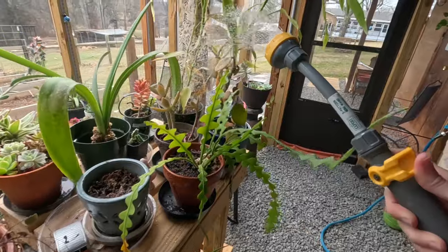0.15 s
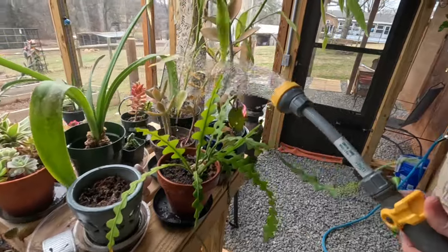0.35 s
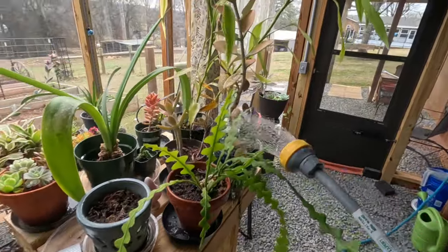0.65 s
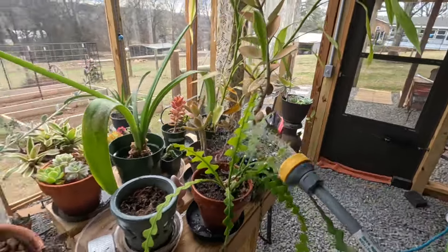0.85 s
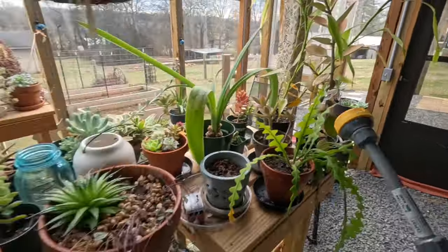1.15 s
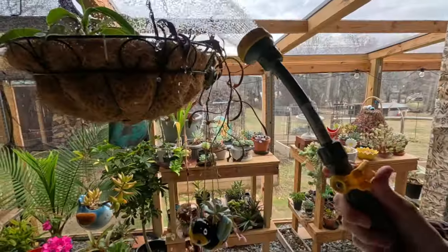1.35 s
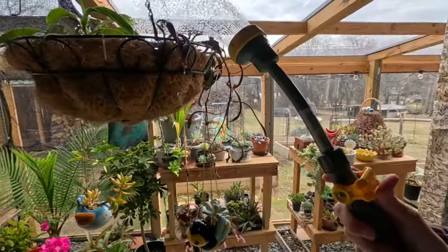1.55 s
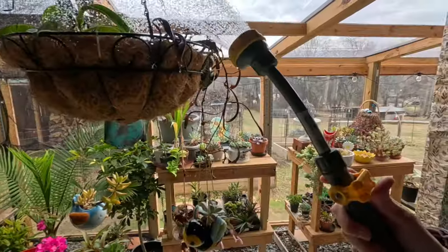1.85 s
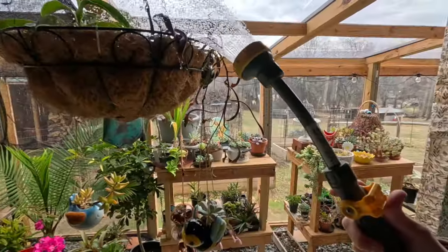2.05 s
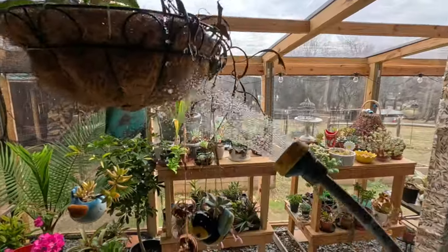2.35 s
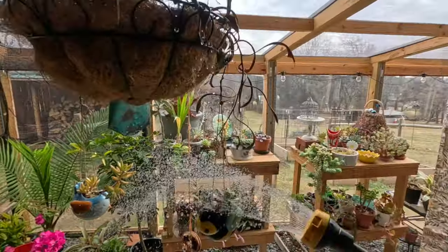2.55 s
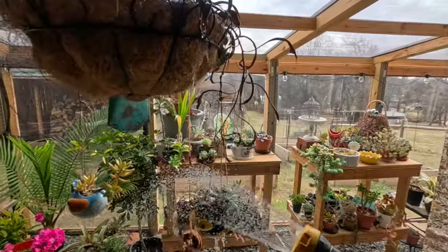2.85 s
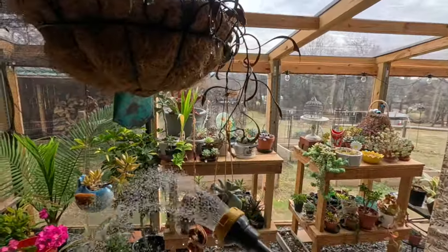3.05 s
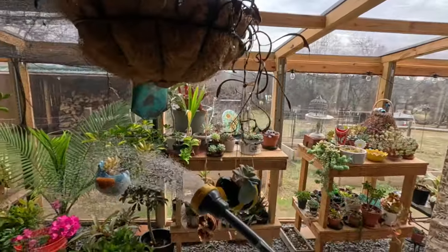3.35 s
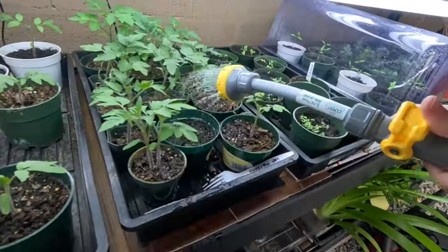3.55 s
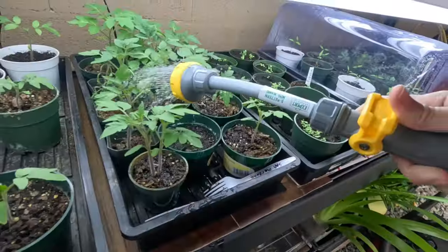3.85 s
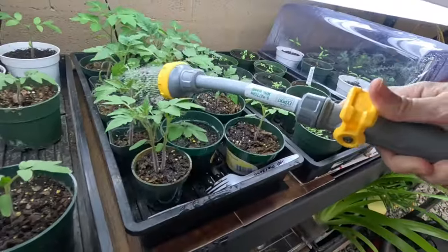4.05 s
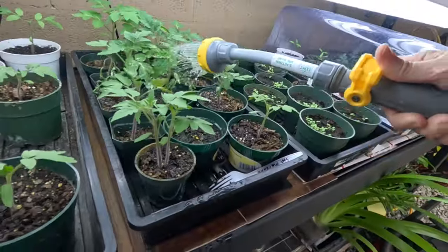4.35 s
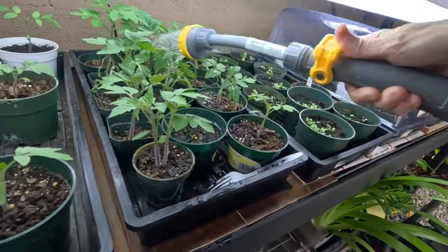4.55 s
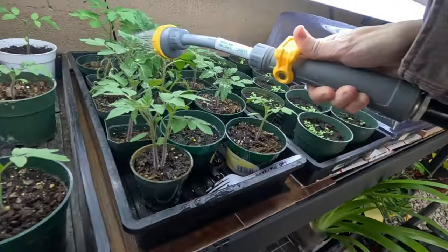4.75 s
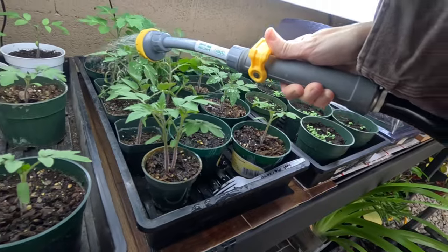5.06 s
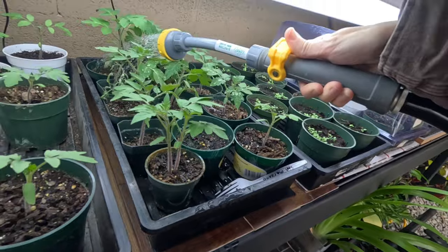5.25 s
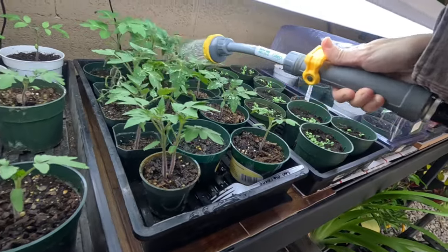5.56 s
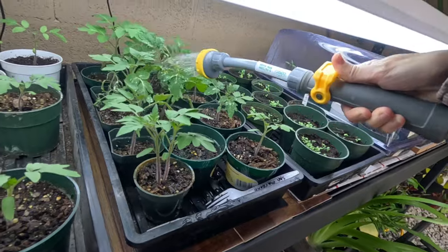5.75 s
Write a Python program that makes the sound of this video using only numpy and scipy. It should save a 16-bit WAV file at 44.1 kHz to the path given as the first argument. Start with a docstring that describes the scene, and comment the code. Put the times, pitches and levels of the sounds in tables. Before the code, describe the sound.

A short low thud opens, and water is already spraying from a hose wand close to the microphone, a dense hiss of droplets on potted plants in a greenhouse. At about 1 second the spray dies away, with a soft low thump and faint scuffs on gravel. It returns abruptly at 1.2 seconds, its tone shifting as it moves over a hanging basket, shrubs and pots. From about 1.4 seconds, run-off drips drum irregularly on hollow plastic a little to the left, growing busier after 2.3 seconds. At 3.5 seconds the drips stop and the hiss suddenly changes colour, continuing over trays of seedlings until the end, near 6 seconds. A few light knocks and splashes come between 3.6 and 5.3 seconds. A low rumble runs underneath throughout, and a soft hum comes and goes from about 2 seconds.

```python
"""A greenhouse, close to a hose wand, heard through a microphone with two ports. Droplets hiss on a bench, a
hanging basket, shrubs, pots, trays and seedlings, each with its own resonances. The spray dies away briefly,
with a scuff on gravel and a thump; then the hiss is back at full strength at once. Run-off drums on hollow
plastic a little to the left, until the hiss abruptly changes colour and the drips stop. A low thud opens; short
knocks and splashes come late. Under it all, a low rumble and at times a hum."""
import sys
import numpy as np
from scipy import signal
from scipy.fft import rfft, irfft
from scipy.io import wavfile
from scipy.ndimage import uniform_filter1d, map_coordinates

SR = 44100
rng = np.random.default_rng(int(sys.argv[2]) if len(sys.argv) > 2 else 0)


def dump(signal):
    """Clip the signal to [-1, 1] and save it as 16-bit WAV at the path in sys.argv[1]."""
    limited = np.clip(np.atleast_2d(signal).T, -1, 1)
    pcm = np.round(limited * 32767).astype(np.int16)
    wavfile.write(sys.argv[1], SR, pcm)


N = 259749
TIME = np.arange(N) / SR
SHUT_S, RETURN_S = .96, 1.2175  # the trigger is let go; the hiss is back at full strength at once
DRIPS_END_S = 3.47  # the drips stop as the hiss abruptly changes colour

# Where splash, patter, hiss and mist sound. Each row: lower edge in Hz, upper edge in Hz.
SPRAY_BANDS = [(1000, 2100), (2100, 4000), (4000, 8300), (8300, 13000)]
# Droplet impacts on any target. Each row: frequency in Hz, relative level in dB.
DROPLET_SPECTRUM = [(300, -25.5), (750, -29), (1100, -22.5), (1280, -12.5), (1480, -17.5), (1950, -19),
                    (2400, -6.5), (4000, -6), (6400, -4.5), (8400, -5), (11000, -4.5), (12400, -7),
                    (13300, -19.5), (14200, -14)]
# Resonances of each target under the spray. Each row: centre in Hz, half width in Hz, lift in dB.
BENCH_MODES = [(2840, 270, 5.5), (4910, 480, 11.5), (5730, 240, 6.5), (6970, 260, 5), (7800, 1100, 10)]
BASKET_MODES = [(630, 170, -7), (2810, 250, 4), (4020, 180, -1.5), (4920, 310, 15.5), (5820, 320, 8.5),
                (7060, 290, 11), (7830, 220, 9.5)]
SHRUB_MODES = [(2700, 240, 3.5), (4895, 180, 10.5), (5570, 390, 9), (7380, 530, 12.5), (8700, 690, 5.5),
               (10800, 300, -5)]
POT_MODES = [(3150, 280, 8.5), (4000, 300, 0), (4930, 330, 9), (5760, 190, 6), (7100, 160, 6.5),
             (8150, 490, 4), (10500, 800, -2.5)]
TRAY_MODES = [(2875, 210, 10), (3640, 170, -5.5), (4660, 400, 13.5), (5750, 280, 11.5), (6990, 410, 10.5),
              (7750, 180, 11.5), (11050, 350, 0.5)]
SEEDLING_MODES = [(2630, 800, 11.7), (3580, 120, 6.5), (4730, 320, 9), (5630, 330, 5.7), (7100, 600, 8.3)]
# The spray on bench back, bench front, basket, shrubs, pots, trays and seedlings. Each row: relative
# hiss level in dB, then splash, patter and mist in dB against the hiss, left minus right in dB.
TARGET_LEVELS = [(-22.5, -20, -5, -5.5, 1.5), (-22.5, -18.5, -5.5, -7, 2.1), (-21, -20.5, -8.5, -10, 0.6),
                 (-21, -21.5, -8, -8.5, 1.5), (-22.5, -18, -3, -9, 3), (-20, -23, -6, -9, 1.6),
                 (-23, -19, -7, -6.5, 3)]
# One target's sound gives way to the next. Each row: start and end in seconds; an earlier end is a jump.
TARGET_CHANGES = [(.5, 0.53), (1.1, 0.97), (2.12, 2.5), (2.96, 3.07), (3.465, 3.475), (4.27, 4.42)]
# Brief swells and dips of the hiss around one pitch.
# Each row: time and half length in seconds, pitch in Hz, lift in dB.
HISS_SWELLS = [(0.32, 0.28, 4800, 5.5), (1.05, 0.049, 4900, -10), (1.36, 0.11, 2850, 5),
               (1.69, 0.048, 5050, 5), (2.03, 0.065, 5400, 5.5), (1.857, 0.22, 10230, 6),
               (2.27, 0.075, 10000, 9), (2.262, 0.081, 3050, 3.5), (2.808, 0.092, 7340, 2),
               (3.187, 0.054, 4900, 6), (3.188, 0.035, 3000, -7), (3.21, 0.037, 8000, 6.5),
               (3.911, 0.084, 2830, 2), (4.06, 0.23, 5788, 2.5), (4.52, 0.089, 7550, 6.5),
               (4.572, 0.085, 7200, 0), (4.47, 0.05, 3250, 3), (4.91, 0.17, 5150, 6.5),
               (5.6, 0.12, 5640, 2.5), (5.25, 0.28, 6000, 7), (5.13, 0.17, 6852, -4),
               (5.72, 0.098, 4800, 4)]
# The microphone's two ports.
# Each row: frequency in Hz, coherence, phase in radians, left minus right in dB.
MIC_PORTS = [(200, 0.19, -0.35, -3.5), (1300, 0.92, -0.53, -2.1), (2900, 0.7, -0.59, -4.5),
             (5070, 0.99, -0.96, -4.5), (6480, 0.048, 1, -2), (6900, 0.36, 0.46, 2), (7980, 1, -0.045, 0),
             (11400, 1, 0.0, 0), (11800, 0.87, 0.05, 0)]
# The low rumble's spectrum. Each row: frequency in Hz, relative level in dB.
RUMBLE_SPECTRUM = [(8, -38), (16, 2), (40, -6), (54, 4.5), (70, -1), (125, -8.5), (170, -8.5), (320, -27.5),
                   (700, -58), (1500, -69)]
# The rumble's slow rise and fall. Each row: time in seconds, level in dB.
RUMBLE_LEVELS = [(0, -38), (1.2, -42), (2.0, -38), (2.8, -41.5), (3.6, -37), (4.6, -37.5), (5.2, -39.5),
                 (5.89, -37.5)]
# A low thud at the start, then short knocks and splashes.
# Each row: start in seconds, level in dB, pitch in Hz, decay in seconds, relative width of the ring.
KNOCKS = [(.003, -23.5, 223, 0.017, 0.11), (3.62, -40.5, 780, 0.015, 0.72), (3.756, -44.5, 580, 0.017, .15),
          (4.208, -45, 315, 0.12, 0.27), (4.257, -32.5, 575, 0.016, 0.17), (4.92, -40, 1060, 0.035, 0.17),
          (5.214, -41.5, 1050, 0.062, 0.18)]
# Feet scuff the gravel as the spray stops. Each row: start and end in seconds, level in dB.
SCUFF_SPELLS = [(.84, .94, -43.5), (1.085, 1.2, -40.5)]
# The gravel's spectrum. Each row: frequency in Hz, relative level in dB.
GRAVEL_SPECTRUM = [(120, 1), (280, -2.5), (700, -7), (2000, -9.5), (4000, -19.5), (13000, -36)]
# Small run-off drops. Each row: start and end in seconds, relative level in dB.
DRIBBLE_SPELLS = [(1.35, 1.92, -48.5), (2.26, 3.02, -47.5), (3.09, 3.3, -42.5), (3.33, 3.45, -36)]
# Big run-off drops. Each row: start in seconds, relative level in dB, relative slap strength in dB.
BIG_DRIPS = [(1.44, -18, -9), (1.461, -26, -7), (1.548, -20, -1.5), (1.61, -21, 3.5), (1.735, -26.5, 3),
             (1.846, -20.5, -8), (1.877, -21.5, -7), (2.26, -21, -12), (2.411, -29.5, -4),
             (2.507, -16.5, -8.5), (2.526, -25.5, -17), (2.683, -14, -15), (2.699, -22, -13),
             (2.767, -21.5, -10), (2.805, -22, 0), (2.861, -23, 4), (2.917, -13.5, -3.5),
             (2.952, -15.5, -11), (2.966, -16.5, -10.5), (3.176, -20.5, -1), (3.235, -26, 9),
             (3.409, -19.5, -1.5)]
# The hollow plastic they land on. Each row: pitch in Hz, relative level in dB, seconds to fall 60 dB.
TUB_MODES = [(264, 1.5, 0.14), (333.5, 0, 0.18), (393, -8, 0.14), (503, -12.5, 0.17), (576.6, -10, 0.13),
             (600, -16, 0.067), (800, -13, 0.02), (835, -10.5, 0.074), (902, -0.5, 0.053),
             (961, -10.5, 0.17), (1287, -7, 0.056), (1650, -6.5, 0.032)]
# The soft hum. Each row: start and end in seconds, level in dB, pitch in Hz.
HUM_SPELLS = [(1.905, 3.35, -48, 157.5), (3.462, 4.593, -40.5, 161.5), (4.35, 4.825, -42, 147.7),
              (4.896, 5.213, -49.5, 149.4), (5.14, 5.85, -44, 159.7)]


def amp(db):
    """Decibels to gain."""
    return 10 ** (np.asarray(db) / 20)


def unit_rms(x):
    """Scales to rms 1."""
    return x / np.sqrt(np.mean(x ** 2) + 1e-20)


def curve_at(points, hz):
    """Reads a curve on a log-frequency axis."""
    f, value = np.transpose(points)
    return np.interp(np.log(hz + 1), np.log(f + 1), value)


def add(mix, start_s, sound):
    """Mixes a sound in at a time."""
    part = mix[round(start_s * SR):][:len(sound)]
    part += sound[:len(part)]


def coloured(x, spectrum):
    """Filters a signal by a spectrum, at rms 1."""
    return unit_rms(irfft(rfft(x) * amp(curve_at(spectrum, np.fft.rfftfreq(N, 1 / SR))), N))


def wander(samples):
    """Slow random drift at rms 1, smoothed over so many samples."""
    return unit_rms(uniform_filter1d(uniform_filter1d(rng.standard_normal(N), samples), samples))


def spells(rows, attack_s, release_s):
    """Gain of a sound that comes in spells: each rises, holds and dies away."""
    return sum(amp(db) * np.clip((TIME - start) / attack_s, 0, 1)
               * np.exp(-np.maximum(TIME - end, 0) / release_s) for start, end, db in rows)


def impacts(per_s, spread_db):
    """Random clicks; a few stand out, or fall back if the spread is negative."""
    size = amp(spread_db * np.minimum(rng.exponential(1, N), 5)) * rng.choice([-1, 1], N)
    return unit_rms(size * (rng.random(N) < per_s / SR))


def bell(x, centre, half_width):
    """A Gaussian bump of height 1."""
    return np.exp(-.5 * ((x - centre) / half_width) ** 2)


def target_spectra(hz):
    """Droplets excite each target's resonances, in dB; both ends of the bench ring alike."""
    targets = BENCH_MODES, BENCH_MODES, BASKET_MODES, SHRUB_MODES, POT_MODES, TRAY_MODES, SEEDLING_MODES
    lifts_db = [sum(db * bell(hz, centre, width) for centre, width, db in modes) for modes in targets]
    return curve_at(DROPLET_SPECTRUM, hz) + np.array(lifts_db)


def in_turn(per_target, t):
    """Blends one row per target as each gives way to the next."""
    progress = [np.ones(len(t))] + [np.interp(t, change, [0, 1]) for change in TARGET_CHANGES]
    return np.diff(per_target, axis=0, prepend=0).T @ np.array(progress)


def unsteady_hand(colour_db, t, drift=0.0059):
    """The hand is never still: all resonances slide up and down a little together."""
    row, frame = np.indices(colour_db.shape)
    stretch = 1 + drift * np.interp(t, TIME, wander(SR // 8))
    return map_coordinates(colour_db, [row * stretch, frame], order=1, mode="nearest")


def near_echoes(hz, t, strength=.125, nearest_s=.002, farthest_s=.006, drift_s=.0004, dull_hz=9000):
    """Ten echoes off nearby pots and boards comb the hiss, in dB; their paths drift as the wand moves."""
    total, bounce = 1, strength / (1 + (hz[:, None] / dull_hz) ** 2)
    for place, speed, start, phase in rng.random((10, 4)):
        sway = np.sin(2 * np.pi * ((1 + speed) * t / 10 + start))
        delay_s = nearest_s + place * (farthest_s - nearest_s) + drift_s * sway
        total = total + bounce * np.exp(-2j * np.pi * (np.outer(hz, delay_s) + phase))
    return 20 * np.log10(unit_rms(abs(total)))


def drop_sizes(hz, colour_db, levels_db):
    """Big slow drops splash low, small fast ones fizz high: the dB that bring each band to its level."""
    plateaus_hz = np.ravel([(lo * 1.1, hi / 1.1) for lo, hi in SPRAY_BANDS])
    gain_db = 0
    for own_band, (lo, hi), db in zip(np.eye(len(SPRAY_BANDS)), SPRAY_BANDS, levels_db):
        power = (amp(colour_db[(hz >= lo) & (hz < hi)]) ** 2).sum(0) / len(hz)
        weight = np.interp(hz, plateaus_hz, np.repeat(own_band, 2))
        gain_db = gain_db + np.outer(weight, db - 10 * np.log10(power))
    return gain_db


def hiss_swells(hz, t, width_hz=300, broadband=0.06):
    """The hiss briefly swells or dips around one pitch, and slightly as a whole, in dB."""
    return sum(db * np.outer(broadband + (1 - broadband) * bell(hz, pitch, width_hz), bell(t, s, half_s))
               for s, half_s, pitch, db in HISS_SWELLS)


def mic_ports(shared, apart, hz):
    """Two independent spectra become the left and right port, whose mean keeps the level."""
    table = np.array(MIC_PORTS)
    coherence, phase, balance_db = (curve_at(table[:, [0, k]], hz)[:, None] for k in (1, 2, 3))
    lean = amp(balance_db / 2)
    right = np.exp(-1j * phase) * (coherence * shared + np.sqrt(1 - coherence ** 2) * apart)
    mean_gain = np.sqrt(lean ** 2 + lean ** -2 + 2 * coherence * np.cos(phase)) / 2
    return np.array([shared * lean, right / lean]) / mean_gain


def spray(patchy_db=1.4, flutter_db=0.13, sway_db=0.35, trim_db=-1.35):
    """Dense droplet impacts close in front, coloured by what they land on; the jets break up unevenly."""
    frames = dict(fs=SR, nperseg=768, noverlap=576)
    droplets = np.array([impacts(per_s=9000, spread_db=1.0) for port in range(2)])
    hz, t, spectra = signal.stft(droplets, **frames)
    hiss_db, splash_db, patter_db, mist_db, side_db = in_turn(TARGET_LEVELS, t)
    colour_db = unsteady_hand(in_turn(target_spectra(hz), t), t) + near_echoes(hz, t)
    bands_db = drop_sizes(hz, colour_db, [hiss_db + db for db in (splash_db, patter_db, 0, mist_db)])
    patches = uniform_filter1d(rng.standard_normal(colour_db.shape), size=6, axis=0)
    patches = unit_rms(uniform_filter1d(patches, size=12, axis=1))
    flutter = unit_rms(uniform_filter1d(rng.standard_normal(len(t)), size=4))
    breakup_db = patchy_db * patches + flutter_db * flutter
    spectra = mic_ports(*spectra, hz) * amp(colour_db + bands_db + hiss_swells(hz, t) + breakup_db)
    # the finest mist stays in the middle while the rest follows the aim
    lean_db = np.outer(hz < SPRAY_BANDS[-1][0], side_db) / 2
    sound = signal.istft(spectra * amp([lean_db, -lean_db]), **frames)[1][:, :N]
    return sound * amp(trim_db + sway_db * wander(SR // 14))


def rumble(lumpy_db=1.5, side_db=-19):
    """Lumpy low noise, nearly alike at both ports."""
    gain = amp(np.interp(TIME, *np.transpose(RUMBLE_LEVELS)) + lumpy_db * wander(SR // 10))
    mid, side = (gain * coloured(rng.standard_normal(N), RUMBLE_SPECTRUM) for _ in range(2))
    return mid + amp(side_db) * np.array([side, -side])


def burst(t, lo_hz, hi_hz, decay_s):
    """A short burst of band noise that dies away."""
    band = signal.butter(2, [lo_hz, hi_hz], "band", fs=SR, output="sos")
    return unit_rms(signal.sosfilt(band, rng.standard_normal(len(t)))) * np.exp(-t / decay_s)


def knocks():
    """A low thud, then short knocks and splashes: each a noise burst ringing loosely around a pitch."""
    t, mix = np.arange(SR // 3) / SR, np.zeros(N)
    for start_s, db, hz, decay_s, width in KNOCKS:
        add(mix, start_s, amp(db) * burst(t, hz / (1 + width), hz * (1 + width), decay_s))
    return mix


def greenhouse(x, t60_s=0.26, wet_db=-8, width=0.57, echoes_per_s=2000, first_s=.006):
    """Sparse reflections from panes and benches reach the microphone after the direct sound."""
    t = np.arange(SR // 2) / SR
    taps = rng.standard_normal((2, len(t))) * (rng.random((2, len(t))) < echoes_per_s / SR)
    taps *= amp(-60 * t / t60_s) * (t > first_s)
    taps /= np.linalg.norm(taps, axis=1, keepdims=True)
    mid, side = signal.oaconvolve(x[None], taps, axes=1)[:, :N]
    return x + amp(wet_db) * np.array([mid + width * side, mid - width * side])


def scuffs():
    """Gravel clicks underfoot in two scuffs, cut short as the hiss comes back."""
    gravel = coloured(impacts(per_s=3000, spread_db=1.0), GRAVEL_SPECTRUM)
    return gravel * spells(SCUFF_SPELLS, attack_s=.04, release_s=0.089) * (TIME < RETURN_S)


def spray_pause(fall_db_per_s=290, stray_db=-27, stray_db_per_s=15):
    """The spray's gain falls as the valve shuts and stray drops peter out; the sound returns at once."""
    shut_for_s = np.maximum(TIME - SHUT_S, 0) * (TIME < RETURN_S)
    return amp(np.maximum(-fall_db_per_s * shut_for_s, stray_db - stray_db_per_s * shut_for_s))


def thump(start_s=0.98, level_db=-33, pitch_hz=81, swell_s=0.049):
    """A low thump swells and fades just after the valve shuts."""
    age = np.maximum(TIME - start_s, 0)
    return amp(level_db) * age / swell_s * np.exp(1 - age / swell_s) * np.sin(2 * np.pi * pitch_hz * age)


def drop_on_tub(slap_db, split_hz=680, spot_db=3.5, plop=0.32, detune=0.015, attack_s=0.0008):
    """One drop: the modes ring as the spot it hits allows, with a thud below the split, a slap above."""
    t = np.arange(SR // 3) / SR
    hz, db, t60 = np.array(TUB_MODES).T[:, :, None]
    hz = hz * (1 + detune * rng.standard_normal(hz.shape))  # the water film loads each mode differently
    envelopes = amp(db + spot_db * rng.standard_normal(hz.shape) - 60 * t / t60)
    modes = envelopes * np.sin(2 * np.pi * (hz * t + rng.random(hz.shape)))
    low = hz[:, 0] < split_hz
    thud = modes[low].sum(0) + plop * burst(t, lo_hz=250, hi_hz=split_hz, decay_s=0.035)
    slap = modes[~low].sum(0) + burst(t, lo_hz=split_hz, hi_hz=2000, decay_s=0.0087)
    onset = slice(SR // 80)
    ring = thud / np.std(thud[onset]) + amp(slap_db) * slap / np.std(slap[onset])
    ring *= 1 - np.exp(-t / attack_s)
    return ring / np.std(ring[onset])


def run_off(big_trim_db=-7, slap_lift_db=1, small_trim_db=3.5, spots=6):
    """Big drops and a dribble of small ones fall from the basket and drum on the hollow plastic."""
    big = np.zeros(N)
    for start_s, db, slap_db in BIG_DRIPS:
        add(big, start_s, amp(db + big_trim_db) * drop_on_tub(slap_db + slap_lift_db))
    small = sum(signal.oaconvolve(impacts(per_s=35, spread_db=-4.0), drop_on_tub(slap_db=-3.5))[:N]
                for _ in range(spots))
    dribble = unit_rms(small) * spells(DRIBBLE_SPELLS, attack_s=0.0033, release_s=0.013)
    return big + amp(small_trim_db) * dribble


def hum(waver_hz=1.44, waver_db=3.0):
    """A soft low hum comes and goes, each spell nearly steady in pitch."""
    mix = np.zeros(N)
    for start, end, db, hz in HUM_SPELLS:
        gain = spells([(start, end, db)], attack_s=0.059, release_s=0.12)
        gain *= amp(waver_db * wander(SR // 12))
        cycles = np.cumsum(hz + waver_hz * wander(SR // 6)) / SR
        mix += gain * unit_rms(np.sin(2 * np.pi * cycles))
    return mix


def scene():
    """Spray in front of the microphone, drips and knocks a little to the left; the drips stop short."""
    hits = greenhouse(run_off()) * (TIME < DRIPS_END_S) + greenhouse(knocks())
    lean_left = amp([[.6], [-.6]])
    return spray() * spray_pause() + hits * lean_left + rumble() + scuffs() + thump() + hum()


def record(dry, edge_hz=13900):
    """A steep roll-off of the highest treble."""
    low_pass = signal.firwin(255, edge_hz, window=("kaiser", 9), fs=SR)
    return signal.oaconvolve(dry, low_pass[None], "same")


dry = scene()
out = record(dry)
dump(out)
```